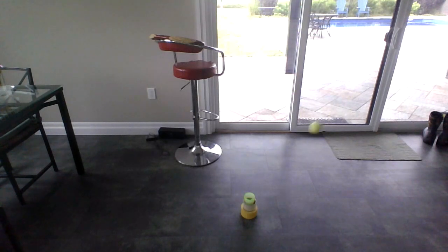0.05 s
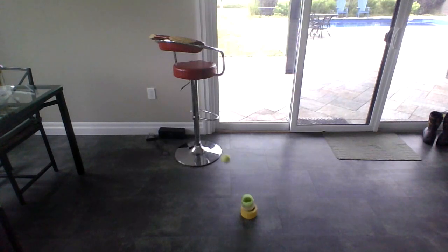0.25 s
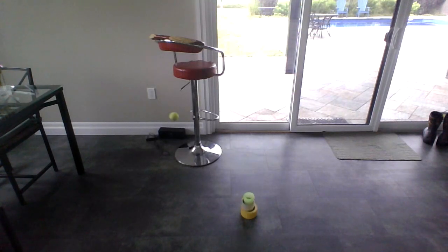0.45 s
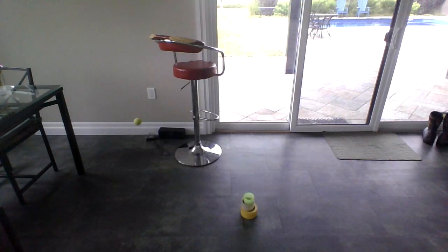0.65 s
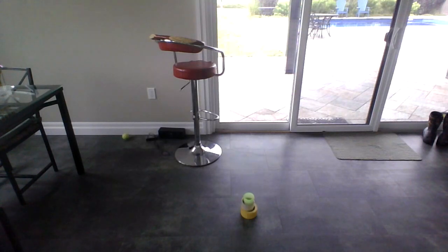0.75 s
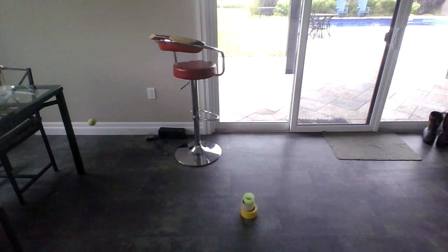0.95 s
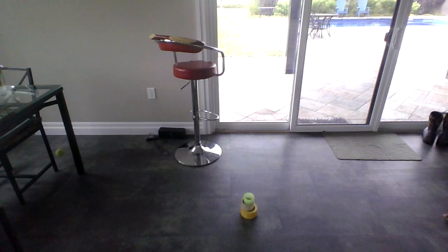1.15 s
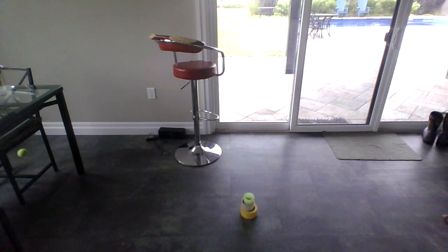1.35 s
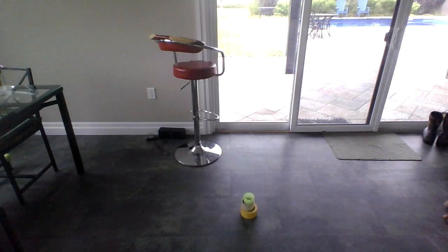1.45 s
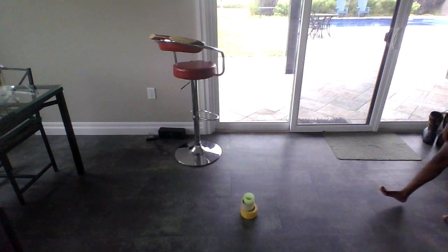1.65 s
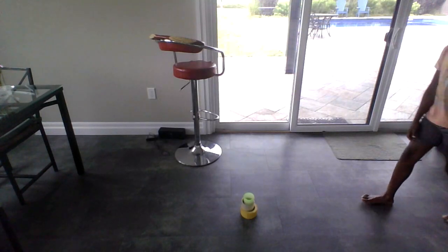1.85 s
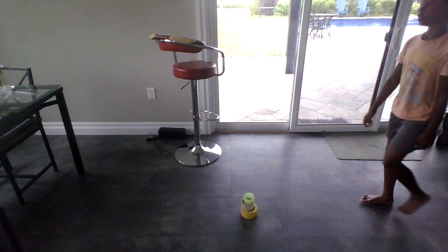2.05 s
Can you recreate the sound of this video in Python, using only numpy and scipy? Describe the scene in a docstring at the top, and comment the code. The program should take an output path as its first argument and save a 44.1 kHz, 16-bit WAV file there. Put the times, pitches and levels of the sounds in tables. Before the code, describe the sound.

A thrown tennis ball bounces several times across a hard floor in a quiet room.

```python
"""A tennis ball is thrown across a quiet, slightly live room with a hard floor.
It smacks down near a plastic toy, knocks against the wall, bounces three times and bumps into
something at the far side. Each impact is a filtered pulse, heard directly and by reflection,
together with damped modes. Slips on the hard surface tick, bare feet scuff and thud softly,
and an appliance drones in the background."""
import sys
import numpy as np
from scipy import signal
from scipy.fft import rfft, irfft
from scipy.io import wavfile

SR = 44100
rng = np.random.default_rng(int(sys.argv[2]) if len(sys.argv) > 2 else 0)


def store_wav(level_fs):
    """Save 16-bit WAV to argv[1]."""
    pcm = np.round(np.clip(np.atleast_2d(level_fs), -1, 1) * 32767)
    wavfile.write(sys.argv[1], SR, pcm.T.astype(np.int16))


N = 92610
T = np.arange(N) / SR
HZ = np.maximum(np.arange(N + 1) * SR / (2 * N), 1)

# Spectra of the contacts and of the air noise: f/Hz, level/dB
SMACK_SPECTRUM = [(25, -3), (60, 20), (100, 9.5), (150, 15), (320, 19.5), (490, 10.5), (680, 21.5),
                  (880, 7), (1200, 7), (1600, -3.5), (2200, -0.5), (2600, -8.5), (2950, -2), (3300, -14.5),
                  (3900, -9), (8600, -13.5), (10500, -21), (15500, -22)]
WALL_SPECTRUM = [(60, -27), (140, 7), (260, 10.5), (520, 7.5), (850, -3), (1400, -5.5), (1850, 0),
                 (2500, -16.5), (3500, -24.5), (9000, -36), (15000, -38)]
BUMP_SPECTRUM = [(50, -22), (150, -4.5), (420, -6.5), (660, -4), (850, -11), (1300, -3), (1600, -17.5),
                 (2000, -20.5), (2500, -40), (12000, -49)]
BOUNCE_SPECTRUM = [(35, -7), (110, 13), (330, 8.5), (480, 2.5), (780, -4.5), (1000, 0.5), (1220, 9.5),
                   (1380, 6.5), (1600, -2), (2000, -3.5), (2500, -11.5), (3300, -16.5), (5000, -23),
                   (15000, -31)]
TICK_SPECTRUM = [(1000, -5), (5000, -1), (9000, -5), (15000, 8)]
SCUFF_SPECTRUM = [(400, 0), (1800, 2), (3000, 0), (8000, 2.5), (11000, 3), (15500, 4.5)]
AIR_SPECTRUM = [(25, -8), (70, -11), (115, -9.5), (200, -2.5), (300, -14), (430, -8), (700, -23.5),
                (1250, -23.5), (2400, -34), (4000, -36.5), (6900, -39), (7350, -34), (7800, -41),
                (15500, -40.5)]
# Modes excited by each impact: f/Hz, level/dB, T60/s
SMACK_RESONANCES = [(60.6, -37.5, 0.35), (145.6, -27.5, 0.27), (162, -40, 0.59), (248.3, -35, 0.63),
                    (306, -33, 0.33), (325.7, -35, 0.71), (479, -49.5, 1), (561, -40, 0.63),
                    (642, -35, 0.69), (775, -49, 0.55), (2342, -72, 0.38), (2923, -56, .3)]
WALL_RESONANCES = [(199, -40.5, 0.24), (252.7, -33.5, 0.25), (309, -44.5, 0.28), (1800, -45, 0.13)]
BUMP_RESONANCES = [(56.9, -47, 0.5), (153, -53.5, 0.32), (201.4, -50, 0.25), (530, -51.5, 0.22),
                   (670, -36, 0.043), (1320, -43, 0.05)]
BOUNCE_RESONANCES = [(65.8, -48, .6), (123.3, -32.5, 0.27), (352.6, -55.5, 0.9), (446, -46.5, 0.46),
                     (1220, -52, 0.66), (1253, -47.5, 0.37), (1325, -47, 0.28), (2010, -49, .3)]
HEEL_RESONANCES = [(60.3, -1, 0.71), (111, -2.5, 0.24)]
# Bounces: t/s, level/dB, tilt/(dB/octave), thump f/Hz, thump level/dB, thump T60/s, right-ear lag/ms
LANDINGS = [(.7890, 1.5, -1.5, 213.1, -26.5, 0.36, -.07), (1.2330, -6, -1.5, 147, -19.5, 0.13, -.09),
            (1.511, -16, -3, 160, -28, 0.15, -.11)]
# Slips of felt or skin: t/s, level/dB
SLIPS = [(.2230, -40), (.4075, -45), (.7905, -50), (.8025, -48), (.8285, -55), (1.2435, -50), (1.2485, -39)]
# Soles brushing the floor: t/s, level/dB, rise/s, T60/s
SOLE_SCUFFS = [(.06, -72, .04, .7), (0.594, -55, .055, 0.65), (.80, -64, 0.035, 0.6),
               (.95, -72.5, 0.036, 0.72), (1.036, -62.5, 0.043, 1), (1.219, -56, 0.023, 0.64),
               (1.495, -66.5, 0.024, 0.29), (1.735, -63, 0.048, 0.82), (1.85, -70.5, .04, 1),
               (1.92, -65, .04, 0.98)]
# Heels loading the floor: t/s, level/dB
HEEL_STRIKES = [(0.501, -60), (0.834, -40.5), (1.079, -54.5), (1.80, -51)]
# Appliance drones: f/Hz, bandwidth/Hz, level/dB
DRONE_BANDS = [(58.13, 1.6, -60), (201.8, 10.6, -61)]
# Stereo width of echoes and of air noise: f/Hz, side level re mid/dB
ROOM_SPREAD = [(60, -31), (130, -20.5), (290, -21), (640, -9.5), (1410, -7.5), (3100, 1), (6820, -3),
               (15000, 1)]
AIR_SPREAD = [(60, -1), (130, -15.5), (290, -22), (640, -7.5), (1410, -5), (3100, 2), (6820, 0.5),
              (15000, 0.5)]
# Reverberation time of the room: f/Hz, T60/s
REVERB_TIMES = [(60, 0.15), (200, 0.59), (600, 0.62), (1400, 0.75), (3000, 0.79), (8000, 0.61),
                (15000, 0.38)]


def ball_knocks():
    """Impact excitation: the hard smack, the knock on the wall and the last dull bump."""
    smack = impact(0.216, SMACK_SPECTRUM, SMACK_RESONANCES, direct_db=-17.5, rise_s=0.0019, lag_ms=0)
    wall = impact(0.4075, WALL_SPECTRUM, WALL_RESONANCES, direct_db=-7, rise_s=0.0048, lag_ms=0.02)
    bump = impact(1.853, BUMP_SPECTRUM, BUMP_RESONANCES, direct_db=-17, rise_s=0.004, lag_ms=-0.11)
    return smack + wall + bump


def ball_bounces():
    """Resonance: the hollow ball pops, and each landing spot swells a low thump of its own."""
    out = 0
    for start, db, tilt_db, thump_hz, thump_db, t60, lag_ms in LANDINGS:
        pop = impact(start, BOUNCE_SPECTRUM, BOUNCE_RESONANCES, direct_db=-13.5, rise_s=0.005,
                     lag_ms=lag_ms, level_db=db, tilt_db=tilt_db)
        thump = damped_modes([(thump_hz, thump_db, t60)], rise_s=0.022)
        out += pop + delay(thump, start)
    return out


def impact(start, spectrum, modes, direct_db, rise_s, lag_ms, level_db=1, tilt_db=0):
    """Superposition of direct pulse (right ear late by lag_ms), reflections and modes."""
    direct = np.zeros((2, N))
    for ear, late_ms in enumerate((max(-lag_ms, 0), max(lag_ms, 0))):
        direct[ear, round(late_ms * SR / 1000)] = from_db(direct_db)
    pulse = shape(direct + reverberation(rise_s), spectrum, tilt_db)
    return from_db(level_db) * delay(pulse + damped_modes(modes, rise_s), start)


def damped_modes(modes, rise_s, ear_lag_s=0.000078):
    """Standing waves build up and decay exponentially, their phase differing between the ears."""
    build = 1 - np.exp(-(T / rise_s) ** 2)
    ears = ear_lag_s / 2 * np.array([[1], [-1]])
    return build * sum(from_db(db) * decay(T, t60) * np.sin(2 * np.pi * hz * (T + ears * (-1) ** k))
                       for k, (hz, db, t60) in enumerate(modes))


def reverberation(rise_s, bands=22):
    """Absorption: after strong early reflections, each band of the echo dies at its own rate."""
    noise = rfft(diffuse_noise(ROOM_SPREAD))
    centres = np.geomspace(60, 16000, bands)
    early = from_db(0.5) * decay(T, t60=0.037)
    onset = np.minimum(T / rise_s, 1) ** 2 * (1 + early)
    out = 0
    for hz, selector in zip(centres, np.eye(bands)):
        share = np.interp(np.log(HZ[::2]), np.log(centres), selector)
        band = irfft(noise * share) * onset * decay(T, at_hz(REVERB_TIMES, hz))
        energy = np.sum(band.mean(axis=0) ** 2)
        out += band * np.sqrt(np.mean(share ** 2) / energy)
    return out


def slip_ticks():
    """Friction: felt or skin slips on a hard surface in brief, bright bursts of noise."""
    burst = decay(T, t60=0.0067)
    return sum(from_db(db) * delay(burst * shaped_noise(ROOM_SPREAD, TICK_SPECTRUM), start)
               for start, db in SLIPS)


def sole_scuffs():
    """Friction noise of bare soles swells and fades; incoherent scuffs add in power."""
    power = 0
    for start, db, rise, t60 in SOLE_SCUFFS:
        swell = np.clip((T - start) / rise, 0, 1) ** 2
        fade = decay(np.maximum(T - start - rise, 0), t60)
        power += (from_db(db) * swell * fade) ** 2
    return np.sqrt(power) * shaped_noise(AIR_SPREAD, SCUFF_SPECTRUM)


def heel_thuds():
    """Sudden loading by a heel excites the low modes of the floor."""
    thud = damped_modes(HEEL_RESONANCES, rise_s=0.0034)
    return sum(from_db(db) * delay(thud, start) for start, db in HEEL_STRIKES)


def appliance_drone():
    """Narrow-band noise: neighbouring frequencies beat, so the two low drones waver."""
    out = 0
    for hz, bandwidth, db in DRONE_BANDS:
        band = rfft(rng.standard_normal(2 * N)) / (1 + (2 * (HZ - hz) / bandwidth) ** 2)
        out += from_db(db) * rms_one(irfft(band)[:N])
    return out


def air_noise():
    """Stationary broadband noise, strongest in the bass."""
    return from_db(-59.5) * shaped_noise(AIR_SPREAD, AIR_SPECTRUM)


def shaped_noise(spread, spectrum):
    """Diffuse noise filtered to a spectrum, at unit power."""
    return rms_one(shape(diffuse_noise(spread), spectrum))


def diffuse_noise(spread):
    """A diffuse field: the two ears are least coherent in the treble."""
    mid, side = rng.standard_normal((2, N))
    return mid + shape(side, spread) * np.array([[1], [-1]])


def shape(x, spectrum, tilt_db=0):
    """Minimum-phase (causal) filtering, tilted by tilt_db per octave about 1 kHz."""
    gain = from_db(at_hz(spectrum, HZ) + tilt_db * np.log2(HZ / 1000))
    cepstrum = irfft(np.log(gain))
    response = np.exp(rfft(2 * cepstrum[:N], 2 * N) - cepstrum[0])
    return irfft(rfft(x, 2 * N) * response)[..., :N]


def decay(t, t60):
    """Exponential damping by 60 dB in t60 seconds."""
    return np.exp(-np.log(1000) * t / t60)


def delay(x, seconds):
    """Translation in time."""
    silence = np.zeros(x.shape[:-1] + (int(seconds * SR),))
    return np.concatenate([silence, x], axis=-1)[..., :N]


def at_hz(points, hz):
    """Interpolation on a log-frequency axis."""
    f, value = np.transpose(points)
    return np.interp(np.log(hz), np.log(f), value)


def from_db(db):
    """Amplitude ratio of a level."""
    return 10 ** (np.asarray(db) / 20)


def rms_one(x):
    """Normalisation to unit power."""
    return x / np.sqrt(np.mean(x ** 2) + 1e-20)


def scene():
    """Linear superposition of ball, feet and background."""
    return (ball_knocks() + ball_bounces() + slip_ticks() + sole_scuffs() + heel_thuds()
            + appliance_drone() + air_noise())


def record(dry):
    """Band limiting: an elliptic low-pass cuts the highest treble steeply."""
    cutoff_hz = 15900
    return signal.sosfilt(signal.ellip(10, .1, 80, cutoff_hz, fs=SR, output="sos"), dry)


dry = scene()
out = record(dry)
store_wav(out)
```